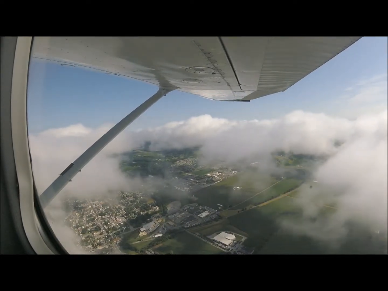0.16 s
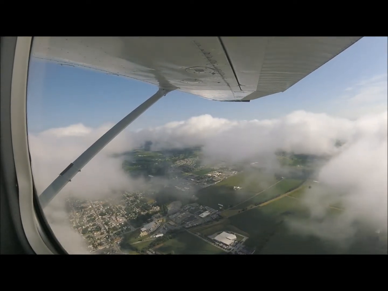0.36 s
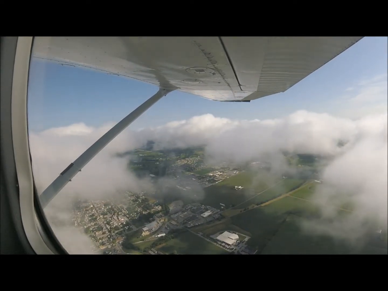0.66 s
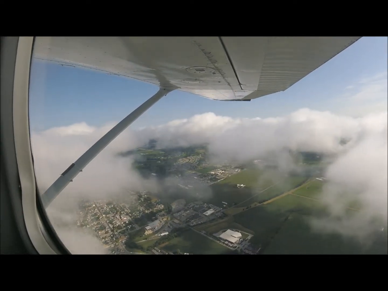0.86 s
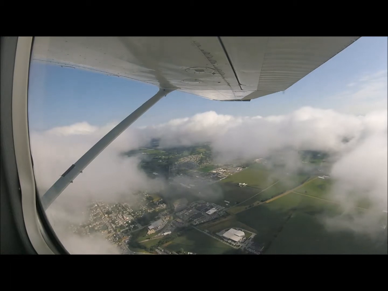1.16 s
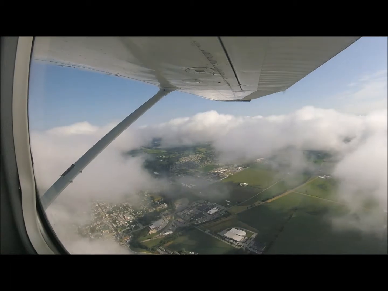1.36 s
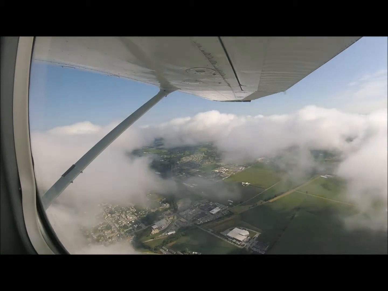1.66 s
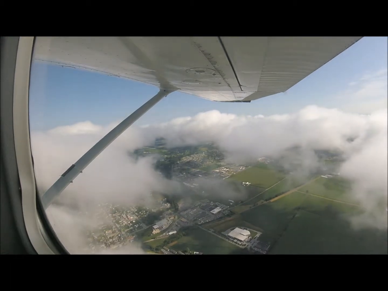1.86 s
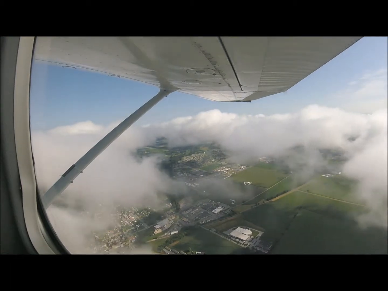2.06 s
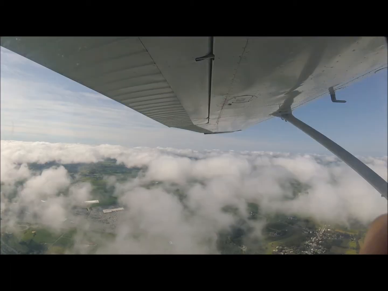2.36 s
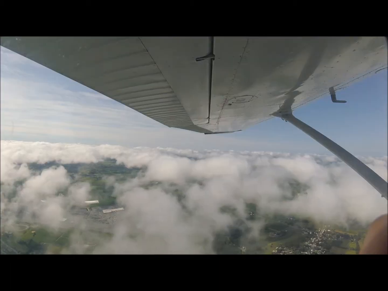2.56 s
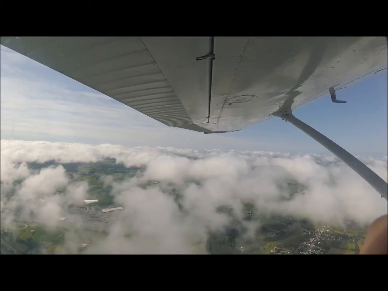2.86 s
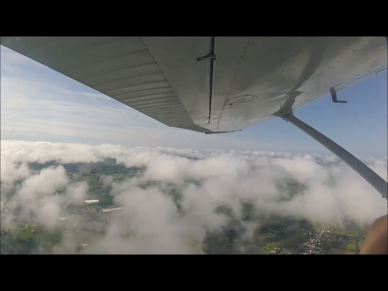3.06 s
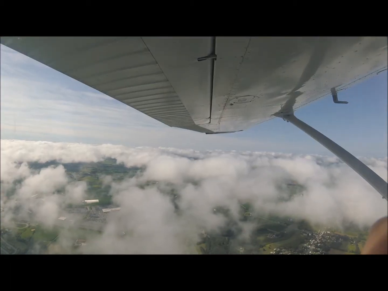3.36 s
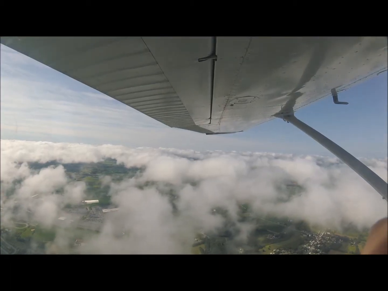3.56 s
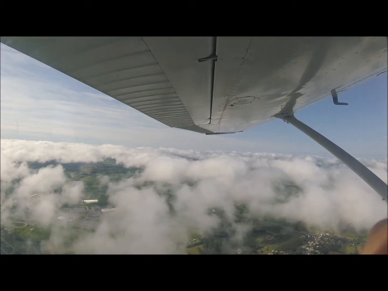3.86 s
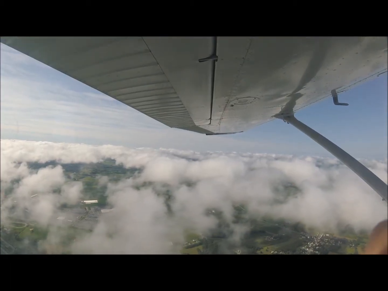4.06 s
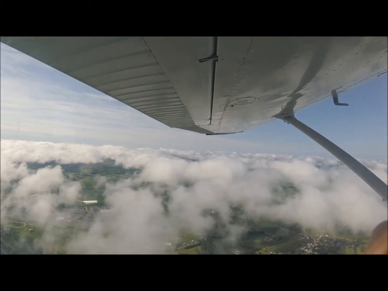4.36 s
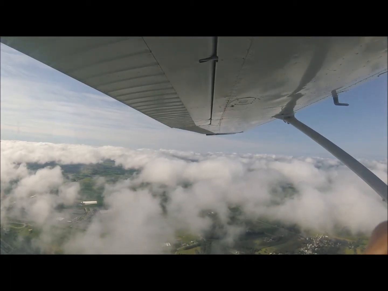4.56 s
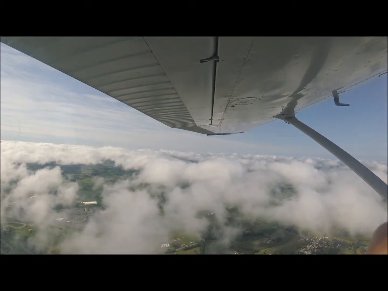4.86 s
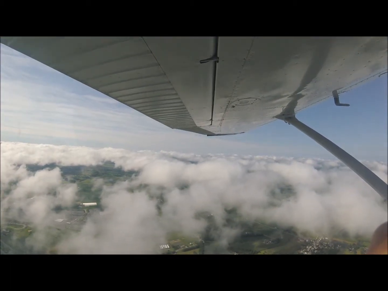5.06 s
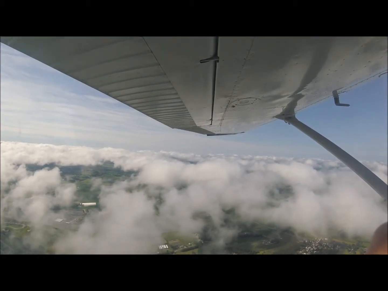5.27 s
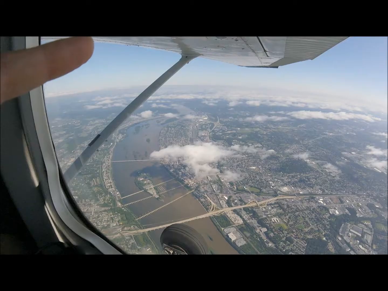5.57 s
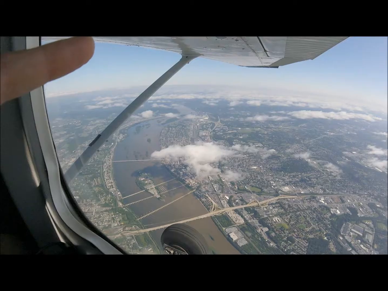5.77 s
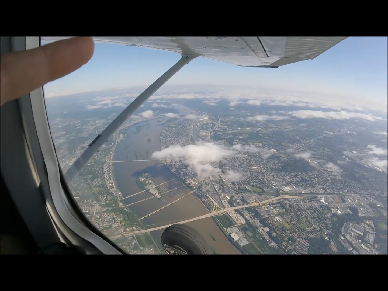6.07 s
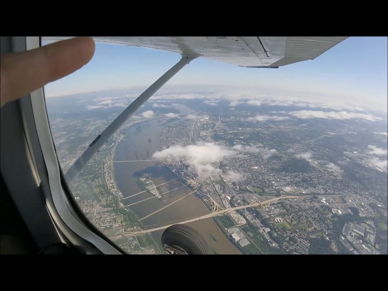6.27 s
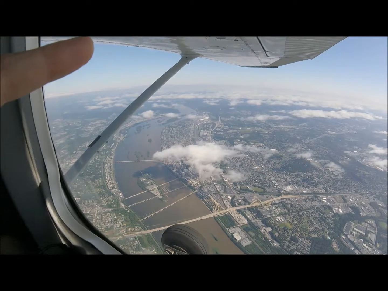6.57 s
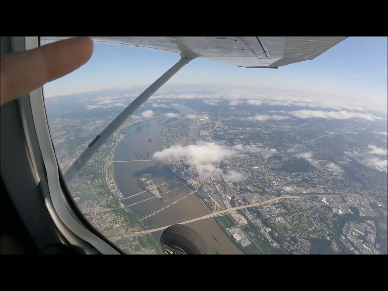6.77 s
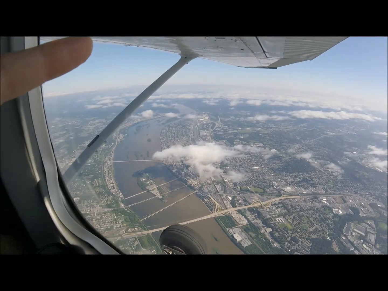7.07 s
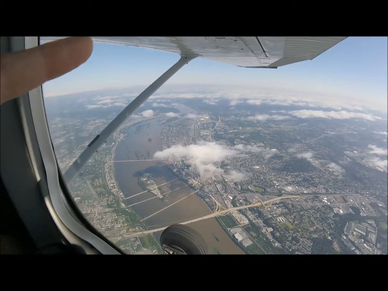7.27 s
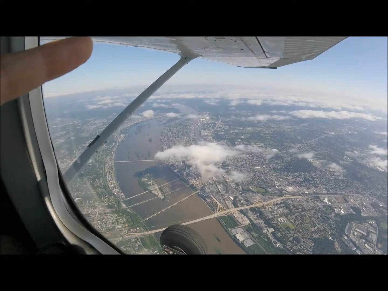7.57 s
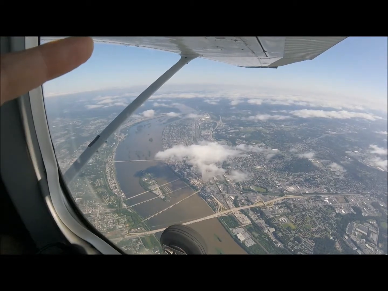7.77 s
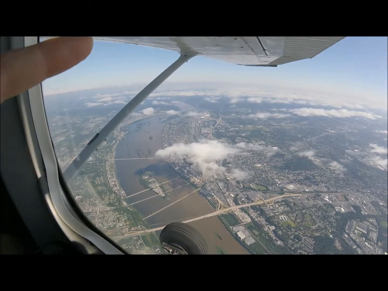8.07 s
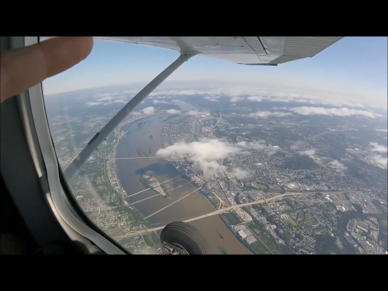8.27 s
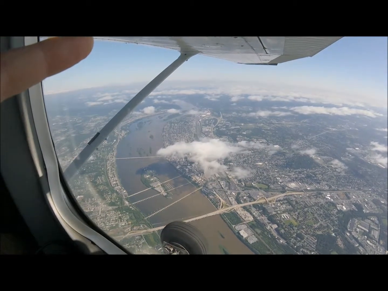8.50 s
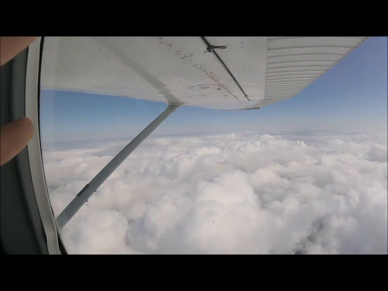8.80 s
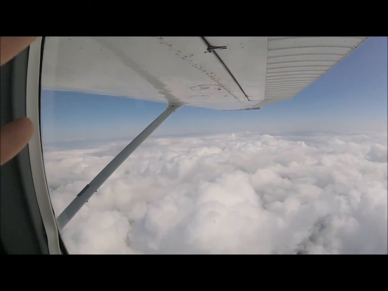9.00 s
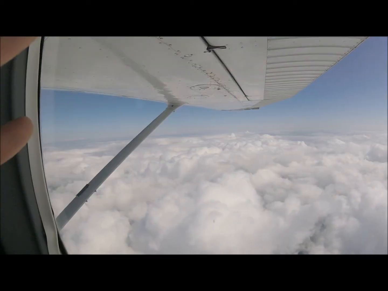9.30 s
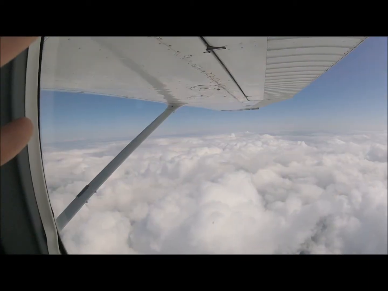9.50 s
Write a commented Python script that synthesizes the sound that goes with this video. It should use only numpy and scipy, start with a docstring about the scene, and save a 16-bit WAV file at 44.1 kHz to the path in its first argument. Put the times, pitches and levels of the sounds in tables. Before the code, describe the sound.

Four stretches of steady light-plane cabin noise, separated by short total silences. A deep four-cylinder engine and propeller hum dominates the first two, with soft rumble and wind hiss beneath. After another hard cut the third sounds rougher and windier, its overtones stronger; the fourth is again droning but still breezy, fading slightly. Returns begin dull for an instant before brightening. Heard from a cabin seat near the window, without echo or other events.

```python
"""Inside the cabin of a small propeller plane in cruise: four stretches parted by short silences.
The first is in full flow at once: a four-cylinder engine and its two-blade propeller drone as a sum
of sines, skin panels rumble and air hisses along the window, both as random noise shaped in pitch.
After a hard cut and a silence, each later stretch starts soft, its rumble and hiss dull, then opens up.
The second and third end in hard cuts too; the fourth plays on to the end."""
import sys
import numpy as np
from scipy import signal
from scipy.io import wavfile
from scipy.ndimage import uniform_filter1d

SR = 44100
rng = np.random.default_rng(int(sys.argv[2]) if len(sys.argv) > 2 else 0)


def materialize(psi):
    """Save the field psi as 16-bit PCM at rate SR to the path in sys.argv[1].

    A 1-D psi becomes a single channel; in a 2-D psi each row is a channel.
    """
    bounded = np.clip(np.atleast_2d(psi).T, -1, 1)
    quanta = np.round(bounded * 32767).astype(np.int16)
    wavfile.write(sys.argv[1], SR, quanta)


N = 425124
T = np.arange(N) / SR  # time of every sample, in s


def gain_of(db):
    """Turns decibels into a plain multiplier."""
    return 10 ** (np.asarray(db) / 20)


def evened(x):
    """Scales a signal to an rms (average strength) of 1."""
    return x / np.sqrt(np.mean(np.abs(x) ** 2) + 1e-20)


def wander(rate_hz, t):
    """Slow chance movement: sines of random phase from 0.3 Hz up to rate_hz, the slow ones largest."""
    total = 0
    for f in np.geomspace(.3, rate_hz, num=16):
        total = total + np.sin(2 * np.pi * (f * t + rng.random())) / np.sqrt(f)
    return evened(total)


# How fast the cylinders fire, one row a stretch: (rate at the start [Hz], rate at the end [Hz])
FIRING_HZ = [(82.04, 82.02), (81.72, 81.52), (84.12, 84.09), (83.93, 83.97)]


def firing_cycles(t, i, end_angle):
    """Counts firings as the engine speed glides; the last sample lands on end_angle (in firing cycles)."""
    cycles = np.cumsum(np.linspace(*FIRING_HZ[i], len(t))) / SR
    return cycles + end_angle - cycles[-1]


# The firing tone and its multiples, one row a stretch, against the drone level:
# (first multiple [dB], second [dB], ... twelfth [dB])
FIRING_TONES = [
    [0, -13.5, -22, -26, -30.5, -35, -33, -33.5, -34, -42, -48, -43],
    [0, -11, -24, -29, -35, -30.5, -32, -46, -38.5, -33, -52, -52],
    [0, -6.5, -5.5, -21, -28, -19.5, -28, -28.5, -35, -35, -31, -36],
    [0, -9, -17, -25, -28, -27.5, -34, -34.5, -37, -42, -35, -45],
]
# Loud orders that beat against the first, second and fourth multiples once an engine cycle:
# (four orders [multiples of the firing rate])
LOPING = (3 / 4, 5 / 4, 9 / 4, 17 / 4)
# Their levels, one row a stretch, against the drone level: (one level for each order [dB])
LOPING_DB = [(-26, -20, -24.5, -33), (-26, -20.5, -29, -31), (-15, -7.5, -11.5, -29), (-24, -13, -19, -32)]
# Faint orders from unequal cylinders, one row each for a quarter, a half and three quarters of the way
# between two multiples: (level above the first multiple [dB], fall [dB per octave])
BETWEEN = [(-3, 3.5), (-6, 2.5), (0, 4.5)]
# Shared level of the faint orders against the drone level: (one level for each stretch [dB])
BETWEEN_DB = [-28, -29, -19, -23]
SCATTER_DB = 2.0  # chance spread of the faint orders


def engine_orders(i):
    """A four-stroke cycle holds four firings, so tones fall on quarters: (multiple of firing rate, dB)."""
    tones_db = FIRING_TONES[i]
    level = {}
    for quarter, (first_db, fall_db) in enumerate(BETWEEN, start=1):
        for n in range(1, len(tones_db) - 1):
            faint_db = BETWEEN_DB[i] + first_db - fall_db * np.log2(n)
            level[n + quarter / 4] = faint_db + SCATTER_DB * rng.standard_normal()
    level.update(zip(LOPING, LOPING_DB[i]))  # the loud orders replace faint ones at the same place
    level.update(enumerate(tones_db, start=1))
    return level.items()


def drone(t, cycles, i, lag):
    """Each order is a sine locked to the crank; gusts and uneven firing make it waver a little on its own."""
    out, coarse = np.zeros(len(t)), t[::256]
    for k, db in engine_orders(i):
        waver_db = np.interp(t, coarse, 0.4 * wander(6, coarse))
        slip = np.interp(t, coarse, 0.0023 * k * wander(5.5, coarse))
        # the cabin shifts the overtones against the firing tone, which skews the pulse;
        # orders between the firings fall anywhere
        angle = lag * (k - 1) if k % 1 == 0 else rng.random()
        gain = gain_of(db + waver_db * (k != 1))  # the firing tone itself keeps a steady level
        out += gain * np.sqrt(2) * np.cos(2 * np.pi * (k * cycles + angle + slip))
    return out


DULL_HZ, OPENS_HZ_PER_S = 1650, 7100  # the treble corner at each start and how fast it climbs


def airflow(spectrum, lo_hz, hi_hz, start, t, size, patchy_db, peaks=()):
    """Random short-time spectra with drifting patches, rms 1 between lo_hz and hi_hz before the dulling."""
    hop = size // 4
    frames, hz = len(t) // hop + 8, np.fft.rfftfreq(size, 1 / SR)
    real, imaginary, patches = rng.standard_normal((frames, len(hz), 3)).T
    # smoothing over both pitch and time turns chance values into patches
    patches = uniform_filter1d(patches, size=8, axis=0)
    patches = evened(uniform_filter1d(patches, size=8, axis=1))

    f, db = np.transpose(spectrum)
    shape = gain_of(np.interp(np.log(hz + 1), np.log(f + 1), db, left=-100, right=-100))
    lift = sum(lift_db / (1 + (2 * (hz - peak_hz) / width) ** 2) for peak_hz, width, lift_db in peaks)
    shape = shape * gain_of(lift)
    shape = shape / np.sqrt(np.sum(shape[(hz > lo_hz) & (hz < hi_hz)] ** 2))

    age = t[0] + np.arange(frames) * hop / SR - start
    corner = DULL_HZ + OPENS_HZ_PER_S * age
    dull = 1 / np.sqrt(1 + (hz[:, None] / corner) ** 4)  # a two-pole low-pass
    spectra = (real + 1j * imaginary) * shape[:, None] * dull * gain_of(patchy_db * patches)
    noise = signal.istft(spectra, nperseg=size, noverlap=size - hop)[1]
    return noise[:len(t)] * np.sqrt(2 / 3)


# Panels shaken by the airflow, one table a stretch: (frequency [Hz], relative level per Hz [dB])
RUMBLE = [
    [(8, -28.5), (21, -12), (41, -0.5), (62, -2), (103, -0.5), (144, -3.5), (205, -3), (267, -8.5),
     (349, -10.5), (451, -16), (595, -14.5), (759, -15), (943, -21), (1300, -52)],
    [(8, -36), (20, -4), (41, -1.5), (61, -0.5), (102, 2), (143, -5), (204, -2.5), (265, -9), (347, -8.5),
     (448, -12), (591, -17.5), (754, -13), (938, -18), (1300, -46.5)],
    [(8, -37.5), (21, -10), (42, -3), (63, 1), (105, -4), (147, -7), (210, -6), (274, -9), (358, -13),
     (463, -19), (610, -16), (779, -18.5), (968, -17.5), (1300, -52.5)],
    [(8, -35), (21, -12), (42, -3), (63, -6.5), (105, -7), (147, -9.5), (210, -5.5), (273, -11.5),
     (357, -16), (462, -18.5), (608, -16), (776, -18), (965, -21), (1300, -63)],
]


def rumble(t, start, i):
    """Air shakes the skin panels at random, mostly at low pitches."""
    return airflow(RUMBLE[i], 350, 890, start, t, size=4096, patchy_db=0.8)


# Air rushing past window and door seals, one table a stretch: (frequency [Hz], relative level per Hz [dB])
HISS = [
    [(700, -25), (1000, -3), (1200, -1), (1450, -2.5), (2000, -5), (2800, -8), (3300, -13), (3800, -15.5),
     (4500, -10), (5100, -17), (6450, -14.5), (6900, -22), (7900, -28), (9300, -37), (11200, -39)],
    [(700, -22.5), (1000, -0.5), (1200, -2), (1450, -6.5), (2000, -7), (2800, -12.5), (3300, -13),
     (3800, -15.5), (4500, -15.0), (5100, -17), (6450, -18.5), (6900, -25.5), (7900, -30.5), (9300, -36),
     (11200, -49)],
    [(700, -26), (1000, -6), (1200, -2.5), (1450, -3.5), (2000, -4.5), (2300, -7), (2800, -8.5), (3300, -9),
     (3800, -13.5), (5100, -17.5), (6450, -17.5), (6900, -23.5), (7900, -27.5), (9300, -34.5),
     (11200, -46.5)],
    [(700, -26), (1000, -6), (1200, 2), (1450, -4), (2000, -8), (2300, -7), (2800, -9.5), (3300, -10),
     (3800, -12.5), (5100, -14), (6450, -18), (6900, -21.5), (7900, -30), (9300, -34), (11200, -58)],
]
# Narrow resonances of window and cabin that the hiss passes through, one table a stretch:
# (frequency [Hz], width [Hz], lift [dB])
CABIN = [
    [(2180, 150, 2.5), (2880, 90, 2), (5600, 130, 3)],
    [(1230, 73, 2), (1470, 80, 3.5), (1970, 80, 4.5), (6570, 200, 3.5)],
    [(1310, 90, 2.5), (1430, 120, 2.5), (2250, 230, 4), (6640, 300, 3.5)],
    [(1880, 180, 5.5), (4150, 300, 3), (6510, 200, 4.5)],
]


def hiss(t, start, cycles, i):
    """Rushing air makes high noise, which throbs faintly with the propeller wash, once a firing."""
    throb = 1 + 0.025 * np.cos(2 * np.pi * cycles)
    return throb * airflow(HISS[i], 1000, 8000, start, t, size=1024, patchy_db=0.68, peaks=CABIN[i])


# The mix, one row a stretch: (drone [dB], rumble [dB], hiss [dB], drift of all levels [dB per s])
FLIGHT = [(-10, -29.5, -32.5, -0.1), (-9.5, -31.5, -33.5, 0), (-16.5, -24, -26.2, -.5),
          (-12, -24, -26.5, -3)]
SOFT_S, SOFT_HISS_DB = .032, -3.5  # length of the soft start, in which the hiss sits lower still


def stretch(i, start, end, end_angle, lag, soft_db):
    """One stretch of cruise: drone, rumble and hiss added up, with a soft start and a slow level drift."""
    t = T[(T >= start) & (T < end)]
    drone_db, rumble_db, hiss_db, drift_db = FLIGHT[i]
    cycles = firing_cycles(t, i, end_angle)
    # both steps are rounded, so they click far less than the cut
    rise = np.clip((t - start) / 0.0004, 0, 1)
    soft = 1 - np.clip((t - start - SOFT_S) / 0.0003, 0, 1)  # 1 in the soft start, 0 after it
    sound = gain_of(drone_db) * drone(t, cycles, i, lag)
    sound += gain_of(rumble_db) * rumble(t, start, i)
    sound += gain_of(hiss_db + SOFT_HISS_DB * soft) * hiss(t, start, cycles, i)
    return sound * rise * gain_of(soft_db * soft + drift_db * (t - t[0]))


# One row a stretch; the first starts before time 0, so it is heard already open, and the last outlasts
# the scene: (start [s], end [s], drone angle at the last sample [firing cycles],
# lag of the overtones [cycles per step up the multiples], soft start [dB])
STRETCHES = [(-3, 2.2113, .45, -.02, 0), (2.4232, 5.5146, .97, .46, -6), (5.727, 8.6512, .77, -.155, -8),
             (8.8635, 9.7, .58, -.09, -4)]


def scene():
    """The four stretches laid out with silence between them."""
    out = np.zeros(N)
    for i, row in enumerate(STRETCHES):
        start, end = row[:2]
        out[(T >= start) & (T < end)] = stretch(i, *row)
    return out[None]


CEILING = .8  # the level that the tallest crests bend towards
EDGE_HZ = 16000  # the band limit


def record(dry):
    """The input stage rounds the tallest crests; then a low-pass takes away the highest treble."""
    rounded = dry / (1 + np.abs(dry / CEILING) ** 8) ** (1 / 8)
    low_pass = signal.firwin(511, EDGE_HZ, window=("kaiser", 9), fs=SR)
    return signal.oaconvolve(rounded, low_pass[None], "same")


dry = scene()
out = record(dry)
materialize(out)
```